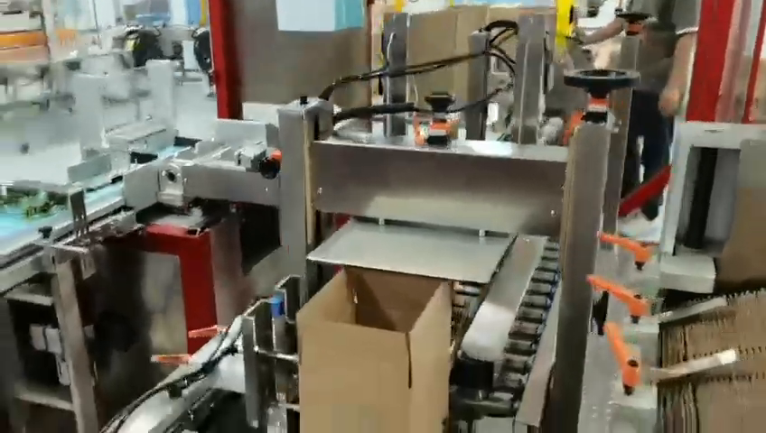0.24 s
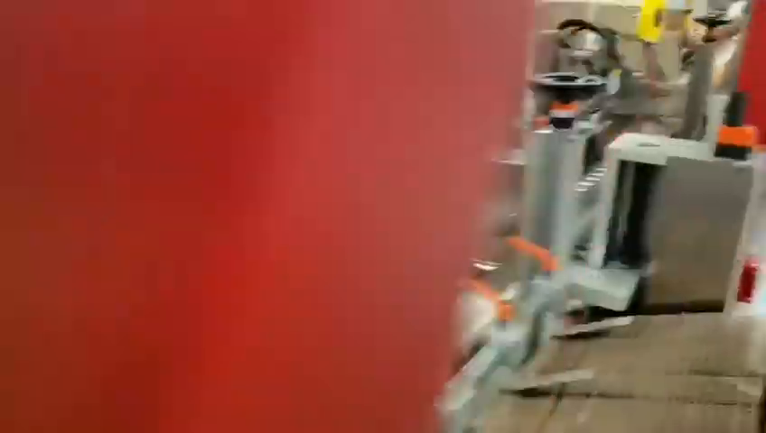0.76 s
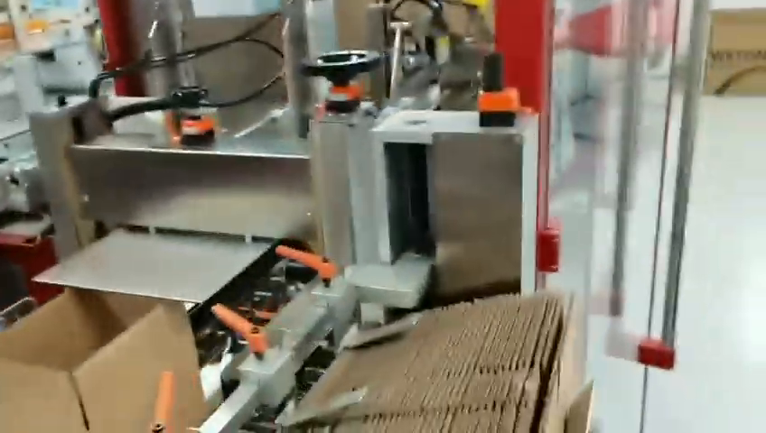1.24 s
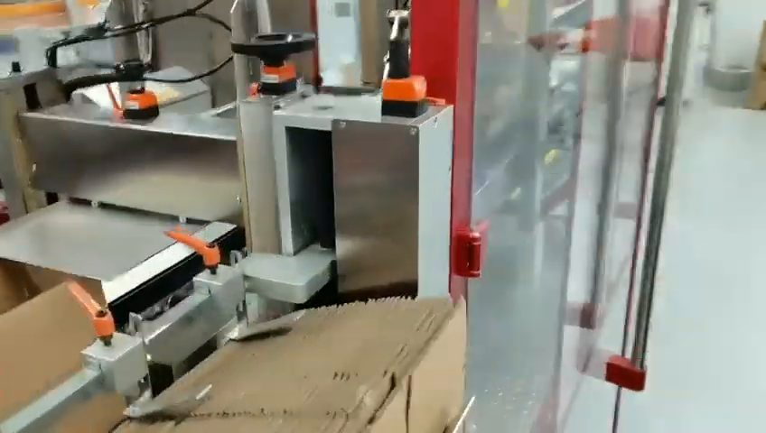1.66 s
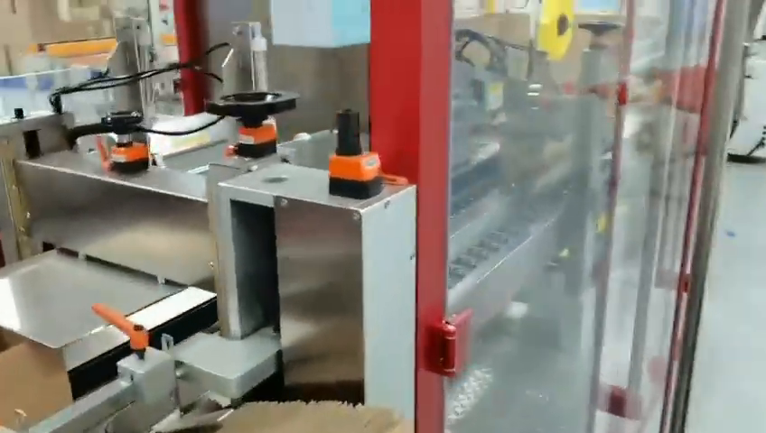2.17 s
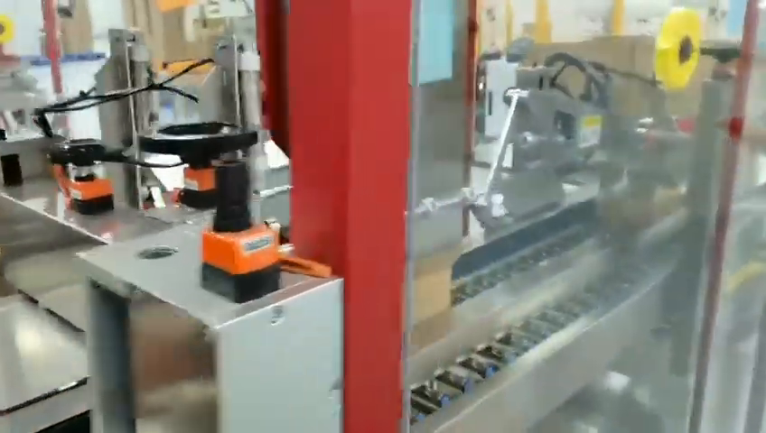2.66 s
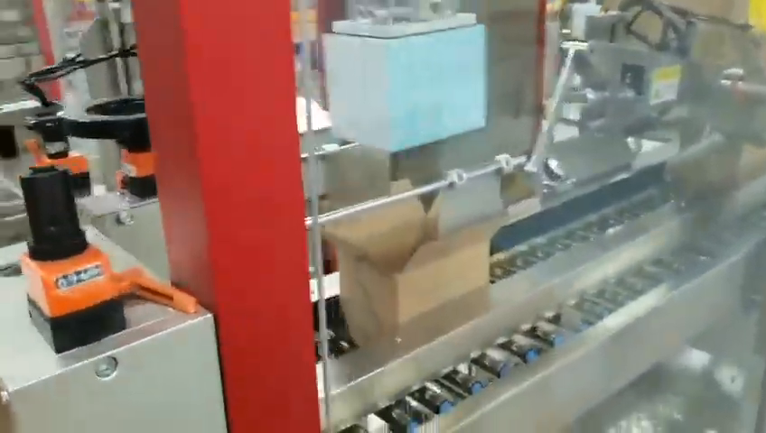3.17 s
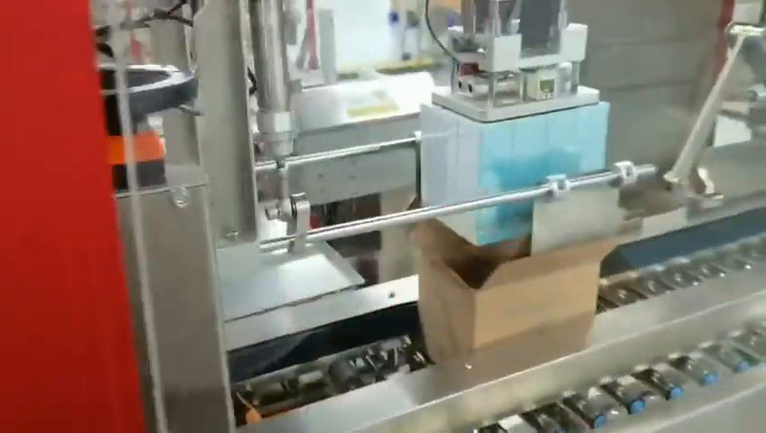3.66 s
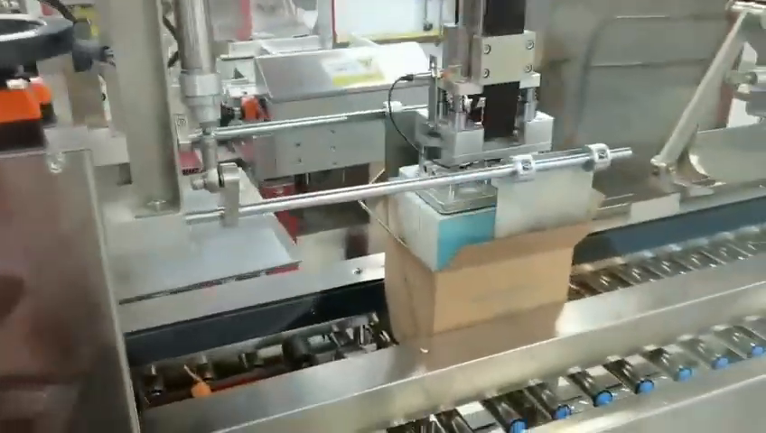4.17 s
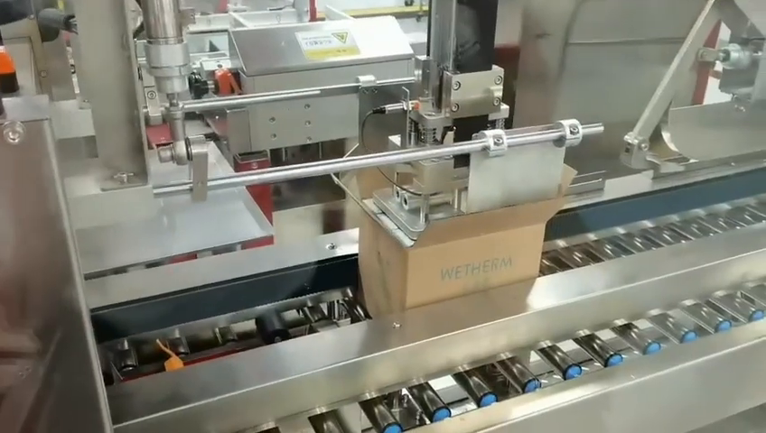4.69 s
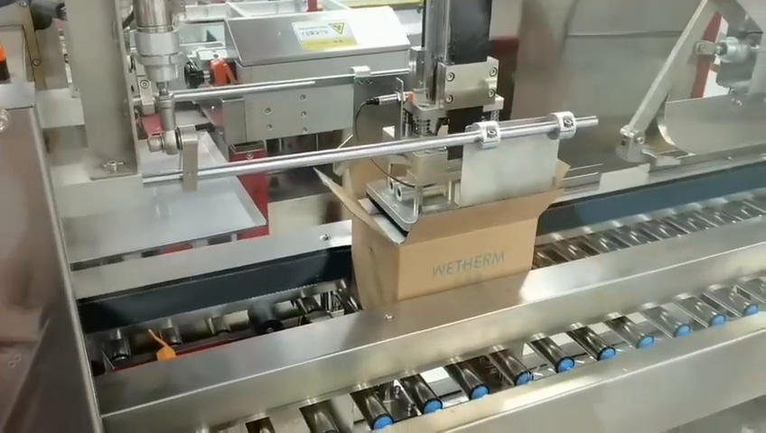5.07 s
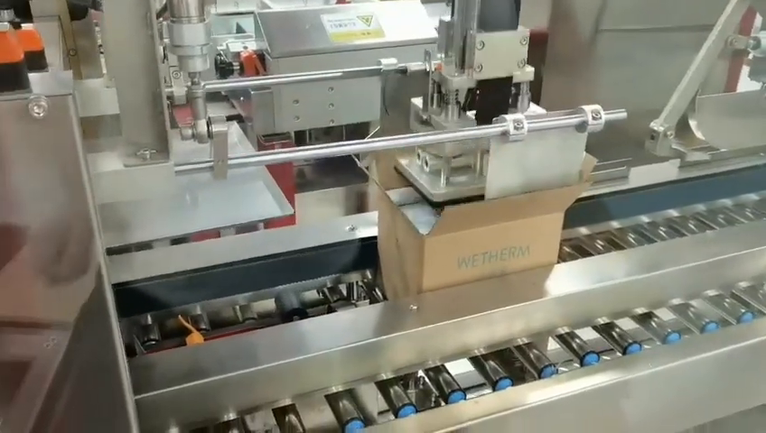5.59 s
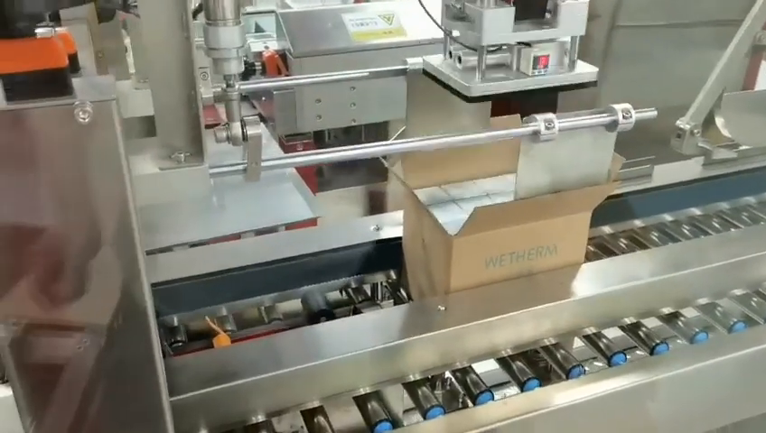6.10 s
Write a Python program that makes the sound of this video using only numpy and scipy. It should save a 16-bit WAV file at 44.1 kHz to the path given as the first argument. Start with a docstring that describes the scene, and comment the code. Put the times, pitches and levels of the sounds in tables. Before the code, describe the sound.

A strong airy hiss fills a machine hall, weakens behind a panel and stops, leaving rumbling conveyors, soft thuds and a faint thin whistle.

```python
"""A suction nozzle on a packing machine hisses through a short tube in a factory hall that hums and rumbles.
Things squeak, cartons knock and one slides early on with a squeal; the listener walks behind a guard panel and
the hiss dulls. Then the air is shut and the hiss dies; near the end a small valve starts a thin whistle. Hiss
and wash are shaped random spectra, whistles and squeaks resonated noise, knocks damped sines."""
import sys
import numpy as np
from scipy import signal
from scipy.fft import rfft, irfft, next_fast_len
from scipy.io import wavfile
from scipy.ndimage import uniform_filter1d

SR = 44100
rng = np.random.default_rng(int(sys.argv[2]) if len(sys.argv) > 2 else 0)


def wav_out(sig):
    """Save sig, one row per channel (or a flat mono array), as 16-bit PCM at SR to the path in sys.argv[1]."""
    wavfile.write(sys.argv[1], SR, np.round(np.clip(np.atleast_2d(sig).T, -1, 1) * 32767).astype(np.int16))


N = 279577
FFT_SIZE, HOP = 1024, 256  # samples
BIN_HZ = np.fft.rfftfreq(FFT_SIZE, 1 / SR)[:, None]
FRAME_S = np.arange(N // HOP + 5) * HOP / SR
SAMPLE_S = np.arange(N) / SR


def nozzle():
    """Turbulent noise in the tube; the supply surges a little; shading and shutting change the resonances."""
    # Hiss as heard. Each row: time in seconds, level in dB.
    flow = [(0, -23.5), (.13, -21.5), (.38, -24), (.48, -22), (.69, -25.5), (.8, -22), (1.2, -21.5),
            (2.1, -22), (2.57, -23), (2.9, -27.5), (2.97, -30), (3.17, -29.5), (3.67, -33.5), (3.9, -33),
            (4.7, -33.5), (4.78, -38), (5.0, -41.5), (5.13, -44.5), (5.26, -47.5), (5.35, -67)]
    # Air through the tube. Each row: frequency in Hz, density in dB per Hz (relative).
    jet = [(1500, -31), (2300, -19.5), (2550, -13.5), (2700, -16), (2900, -6), (3300, 2), (3800, -3),
           (4560, -5.5), (6150, 0), (6800, -3), (7490, -5.5), (8800, -2.5), (9750, -24.5), (10400, -8),
           (11100, 0), (14000, -6.5)]
    # Tube resonances. Each row: centre in Hz, reach in Hz, lift in dB, more lift in dB per dB of shading,
    # more lift in dB once the air is shut.
    resonances = [(3260, 300, 0.33, -0.1142, 1), (6150, 520, 1, 0.296, -3.5), (8400, 1260, -0.76, -0.07, 4),
                  (12050, 1800, 3.5, -0.16, -4.5)]
    # Second resonance, drifting with the listener's angle. Each row: time in seconds, centre in Hz.
    second_centre = [(0, 5960), (1.2, 5950), (2.6, 6000), (3.7, 6100), (4.1, 6400), (4.7, 6400),
                     (5.3, 5970)]
    # Narrow core of the first resonance: centre in Hz, reach in Hz.
    core = (3370, 180)
    # How far the core stands out. Each row: time in seconds, lift in dB.
    core_lift = [(0, 0.3), (.6, 1.5), (1.2, .8), (1.9, -1), (2.6, -1), (3.0, -1), (3.55, -4), (3.75, 2),
                 (4.05, 7), (4.3, 1), (4.6, 1.5), (4.9, 3.5), (5.1, 0)]
    # Thin steady whistles in the hiss. Each row: centre in Hz, reach in Hz.
    thin_whistles = [(2760, 35), (3235, 40), (3555, 50)]
    # Lift of each thin whistle in dB.
    thin_lifts_db = [9.5, 1.5, 1.5]
    # Dip of the hiss, filled by echoes when shaded: centre in Hz, reach in Hz, lift in dB per dB of shading.
    notch = (9660, 450, 0.62)
    open_db = -20  # level in plain view
    shut_s, shut_fade_s = 4.7, 0.088
    wander_db, surge_db = 0.22, 0.39  # rms

    flow_db = follow(flow, FRAME_S)[0]
    # Shading is capped at its value when the supply shuts.
    shaded_db = open_db - np.maximum(flow_db, follow(flow, shut_s)[0])
    shut = np.clip((FRAME_S - shut_s) / shut_fade_s, 0, 1)

    centres, lifts_db = [], []
    for hz, reach_hz, lift_db, shading_slope, shut_db in resonances:
        centres.append((hz, reach_hz))
        wander = wander_db * drift(size=18)
        lifts_db.append(lift_db + shading_slope * shaded_db + shut_db * shut + wander)
    centres[1] = (follow(second_centre, FRAME_S)[0], resonances[1][1])

    colour_db = bumps(centres, lifts_db)
    colour_db = colour_db + bumps(thin_whistles, thin_lifts_db)
    colour_db = colour_db + bumps([notch[:2]], [notch[2] * shaded_db])
    colour_db = colour_db + bumps([core], follow(core_lift, FRAME_S))
    surge = evened(uniform_filter1d(rng.standard_normal(len(FRAME_S)), size=8))
    gone_db = -300. * np.maximum(FRAME_S - flow[-1][0], 0)  # the last air escapes
    control_db = flow_db + colour_db + surge_db * surge + gone_db
    return field(jet, control_db, patchy_db=.7, ripple_db=3.5)


def valve():
    """Air leaking past a seat whistles in narrow bands that rise on the whole as it opens; the level sags late."""
    # Whistle bands. Each row: nominal centre in Hz, width in Hz, level in dB against the leak,
    # delay in seconds after the leak starts, shift in Hz at the sag.
    bands = [(11200, 700, -8, 0, 0), (11950, 330, -2, 0, 0), (12850, 280, -1, .1, -260),
             (13650, 450, -5, .04, -200), (12500, 2200, -1, 0, 0)]
    # Steady whistle of the outlet: centre in Hz, width in Hz, level in dB against the leak.
    outlet = (10230, 260, -5)
    # Opening of the valve. Each row: time in seconds, factor on the band centres.
    opening = [(5.84, .962), (5.9, .985), (5.98, .995), (6.08, 1.01), (6.17, 1.013), (6.21, 1.008),
               (6.34, 1.016)]
    leak_s, leak_rise_s, leak_db = 5.835, .025, -51.5
    sag_s, sag_length_s, sag_db = 6.17, .04, -1.5

    pitch = follow(opening, SAMPLE_S)[0]
    sag = np.clip((SAMPLE_S - sag_s) / sag_length_s, 0, 1)
    whistle = np.zeros(N)
    for hz, width_hz, db, late_s, shift_hz in bands:
        band = steep(rng.standard_normal(N), hz * pitch + shift_hz * sag, width_hz)
        rise = np.clip((SAMPLE_S - leak_s - late_s) / leak_rise_s, 0, 1)
        whistle += gain_of(db) * band * rise

    outlet_hz, outlet_width_hz, outlet_db = outlet
    outlet_tone = gain_of(outlet_db) * steep(rng.standard_normal(N), outlet_hz, outlet_width_hz)
    whistle += outlet_tone * np.clip((SAMPLE_S - leak_s) / leak_rise_s, 0, 1)
    return gain_of(leak_db + sag_db * sag) * whistle


def knocks():
    """Each dull blow is a low damped swing with a soft start."""
    # Each row: start in seconds, peak level in dB, pitch in Hz, 60 dB decay time in seconds.
    blows = [(0.389, -21.5, 261, 0.019), (.472, -33, 148, .05), (0.896, -34.5, 100, 0.044),
             (0.983, -32.5, 295, 0.093), (.99, -39, 500, .06), (1.235, -41, 221, .1),
             (1.383, -33, 122, 0.061), (1.395, -35, 245, .1), (1.432, -41, 250, .06),
             (3.832, -27.5, 151, 0.06), (3.851, -33.5, 175, .15), (5.252, -30, 188, 0.039),
             (5.274, -25.5, 161, 0.042), (5.299, -32, 172, .05), (5.313, -33, 165, .05),
             (5.352, -34, 95, .1), (5.426, -31, 105, .14), (5.503, -32, 90, .16), (6.045, -32.5, 240, 0.13)]
    length = 8000  # samples
    out, t = np.zeros(N + length), np.arange(length) / SR
    for start_s, peak_db, hz, t60_s in blows:
        decay = gain_of(-60 * t / max(t60_s, .005))
        soft_start = 1 - np.exp(-t / 0.00053)
        swing = np.sin(2 * np.pi * hz * t) * decay * soft_start
        out[round(start_s * SR):][:length] += gain_of(peak_db) * swing / abs(swing).max()
    return out[:N]


def slide():
    """Friction noise colours a carton wall; the stroke sticks and slips."""
    start_s, length_s, attack_s, release_s = 0.606, 0.48, 0.032, 0.067
    mean_db, slip_db, centre_hz, width_hz = -46, 2.2, 417, 350.0
    t = SAMPLE_S - start_s
    moving = np.clip(np.minimum(t / attack_s, (length_s - t) / release_s), 0, 1)
    slips = np.interp(SAMPLE_S, FRAME_S, drift(size=5))
    friction = steep(rng.standard_normal(N), centre_hz, width_hz)
    return gain_of(mean_db + slip_db * slips) * friction * moving


def squeaks():
    """Rubbing excites one narrow resonance for a moment; the 810 Hz squeal from 0.45 s belongs to the sliding
    carton."""
    # Each row: start in seconds, length in seconds, level in dB before the fades, pitch in Hz, width in Hz.
    rubs = [(.05, .28, -56, 770, 40), (.45, .25, -49, 810, 18), (.68, .08, -46, 335, 30),
            (.7, .22, -55, 810, 30), (.8, .07, -46, 385, 25), (.885, .05, -47, 420, 30),
            (1.03, .07, -53, 1170, 25), (5.717, .038, -47, 2570, 12), (4.3, .7, -59, 780, 120),
            (5.35, .99, -54, 780, 160)]
    out = np.zeros(N)
    for start_s, length_s, db, hz, width_hz in rubs:
        part = out[round(start_s * SR):][:round(length_s * SR)]  # a view into out
        tone = evened(resonate(rng.standard_normal(N), hz, width_hz)[-len(part):])
        part += gain_of(db) * tone * signal.windows.tukey(len(part), .4)
    return out


def hall():
    """Distant machines blur into a wash; the conveyor rumbles in lumps and shakes the frame."""
    return machinery_wash() + conveyor_rumble()


def machinery_wash():
    """Many distant machines add up to noise; its drone and whirr stand out less as the wash swells."""
    # Each row: time in seconds, level in dB.
    wash = [(0, -47), (.8, -41.5), (2.0, -46), (2.6, -49), (3.3, -52), (4.0, -50.5), (5.1, -51),
            (5.3, -44.5), (5.6, -44), (5.8, -43), (6.05, -43.5), (6.34, -42.5)]
    # Each row: frequency in Hz, density in dB per Hz (relative).
    spectrum = [(300, -11.5), (450, -10), (800, -8.5), (1400, -12), (2300, -11), (3500, -14.5),
                (7000, -20.5), (8100, -21.5), (8600, -28.5), (10500, -29), (14000, -31)]
    # Drone and whirr. Each row: centre in Hz, reach in Hz, lift in dB, less lift in dB per dB of swelling.
    regions = [(553, 720, -1, 0.82), (2540, 1010, -1.26, 1.05)]
    loud_db = -44  # wash level at which the lifts hold as listed
    wash_db = follow(wash, FRAME_S)[0]
    lifts_db = [lift_db + slope * (loud_db - wash_db) for *_, lift_db, slope in regions]
    colour_db = bumps([row[:2] for row in regions], lifts_db)
    return field(spectrum, wash_db + colour_db, patchy_db=1.1, ripple_db=2.5)


def conveyor_rumble():
    """Low noise in random lumps; brief shudders swell it together with the frame's resonance."""
    # Slow level of the rumble, without lumps and shudders. Each row: time in seconds, level in dB.
    rumble_level = [(0, -45), (.23, -54), (.45, -50.5), (1.5, -47.5), (2.3, -48.5), (2.6, -52), (3.5, -50),
                    (4.0, -47), (4.9, -45.5), (5.06, -49), (5.3, -43.5), (6.34, -43)]
    # Conveyor and frame. Each row: frequency in Hz, density in dB per Hz (relative).
    spectrum = [(20, -26), (32, -24), (45, -4.5), (65, -2), (100, -2.5), (180, 0.5), (233, -2.5),
                (384, -9.5), (700, -19.5), (1000, -39)]
    # Resonance of the frame: centre in Hz, width in Hz.
    frame_resonance = (98, 47)
    # Shudders. Each row: centre time in seconds, spread in seconds, rumble peak in dB, boom peak in dB.
    shudders = [(0, 0.06, -46, -35), (0.405, 0.043, -43, -59), (0.5, 0.056, -43, -49),
                (0.742, 0.055, -47, -61), (1.393, 0.047, -51, -48), (2.88, 0.041, -46, -63),
                (3.263, 0.074, -46, -55.5), (3.656, 0.049, -47, -57), (3.87, 0.045, -42, -58),
                (4.636, 0.057, -46, -42), (4.972, 0.04, -57, -46), (5.435, 0.13, -43.5, -46),
                (6.053, 0.051, -42, -55)]
    boom_db, lump_db = -8.5, 1.1  # boom against the slow rumble level; rms of the lumps

    lumps = evened(uniform_filter1d(uniform_filter1d(rng.standard_normal(N), size=700), size=700))
    rumble = gain_of(follow(rumble_level, SAMPLE_S)[0])
    boom = gain_of(boom_db) * rumble
    for centre_s, spread_s, rumble_peak_db, boom_peak_db in shudders:
        swell = np.exp(-((SAMPLE_S - centre_s) / spread_s) ** 2)
        rumble = np.hypot(rumble, gain_of(rumble_peak_db) * swell)
        boom = np.hypot(boom, gain_of(boom_peak_db) * swell)
    low_noise = rumble * coloured(spectrum)
    ringing = boom * steep(rng.standard_normal(N), *frame_resonance)
    return gain_of(lump_db * lumps) * (low_noise + ringing)


def field(points, control_db, patchy_db, ripple_db):
    """Random spectra: random patches drift through the noise, with fine, slowly shifting random lines."""
    real, imag, patches, ripple = rng.standard_normal((len(FRAME_S), len(BIN_HZ), 4)).T
    patches = evened(uniform_filter1d(uniform_filter1d(patches, size=8, axis=0), size=8, axis=1))
    ripple = evened(uniform_filter1d(ripple, size=12, axis=1))
    texture_db = patchy_db * patches + ripple_db * ripple
    plain = (real + 1j * imag) * gain_of(read(points, BIN_HZ) + texture_db)
    spectra = [plain, plain * gain_of(control_db)]
    plain, played = signal.istft(spectra, nperseg=FFT_SIZE, noverlap=FFT_SIZE - HOP)[1][:, :N]
    return played / plain.std()  # the uncontrolled noise sets 0 dB


def bumps(centres, heights_db):
    """Bell-shaped lifts of the spectrum around each centre."""
    return sum(db * np.exp(-((BIN_HZ - hz) / reach_hz) ** 2)
               for (hz, reach_hz), db in zip(centres, heights_db))


def coloured(points):
    """Steady noise of rms 1 with the given spectrum."""
    size = next_fast_len(N)
    gain = gain_of(read(points, np.fft.rfftfreq(size, 1 / SR)))
    return evened(irfft(rfft(rng.standard_normal(size)) * gain, size)[:N])


def steep(x, hz, width_hz):
    """The resonance twice, for dark valleys beside it; rms 1."""
    return evened(resonate(resonate(x, hz, width_hz), hz, width_hz))


def resonate(x, hz, width_hz):
    """Shifts the curve hz down to zero, smooths, and shifts back: a resonance of gain 1."""
    turn = np.exp(2j * np.pi * np.cumsum(hz * np.ones(len(x))) / SR)
    pole = np.exp(-np.pi * width_hz / SR)
    return 2 * (turn * signal.lfilter([1 - pole], [1, -pole], x / turn)).real


def drift(size):
    """Slow chance of rms 1, one value per frame."""
    chance = rng.standard_normal(len(FRAME_S))
    return evened(uniform_filter1d(uniform_filter1d(chance, size=size), size=size))


def follow(rows, t):
    """The columns of a curve table at the times t."""
    s, *columns = np.transpose(rows)
    return [np.interp(t, s, column) for column in columns]


def read(points, hz):
    """A spectrum in dB, straight lines on a log-frequency axis; 30 dB down below the first point."""
    f, db = np.transpose(points)
    return np.interp(np.log(hz + 1), np.log(f + 1), db, left=db[0] - 30)


def evened(x):
    """Scales to rms 1."""
    return x / np.sqrt(np.mean(x ** 2) + 1e-20)


def gain_of(db):
    """Decibels to a factor."""
    return 10 ** (np.asarray(db) / 20)


def scene():
    """All sources at one microphone."""
    return (nozzle() + valve() + knocks() + slide() + squeaks() + hall())[None]


def record(dry):
    """The small microphone loses the deepest bass; then the band limit."""
    bass_cut_hz, edge_hz = 45., 14040
    thin = signal.sosfilt(signal.butter(2, bass_cut_hz, "high", fs=SR, output="sos"), dry)
    low_pass = signal.firwin(2047, edge_hz, window=("kaiser", 9), fs=SR)
    return signal.oaconvolve(thin, low_pass[None], "same")


dry = scene()
out = record(dry)
wav_out(out)
```